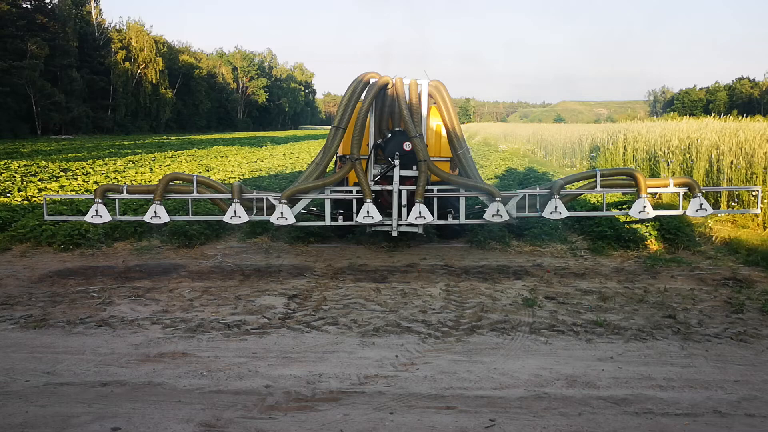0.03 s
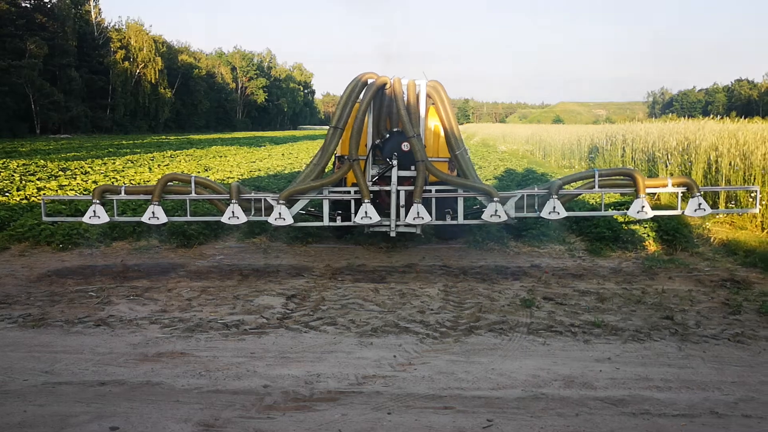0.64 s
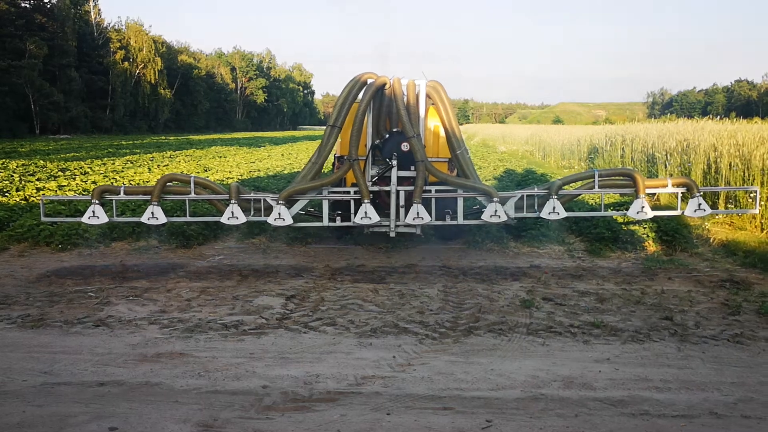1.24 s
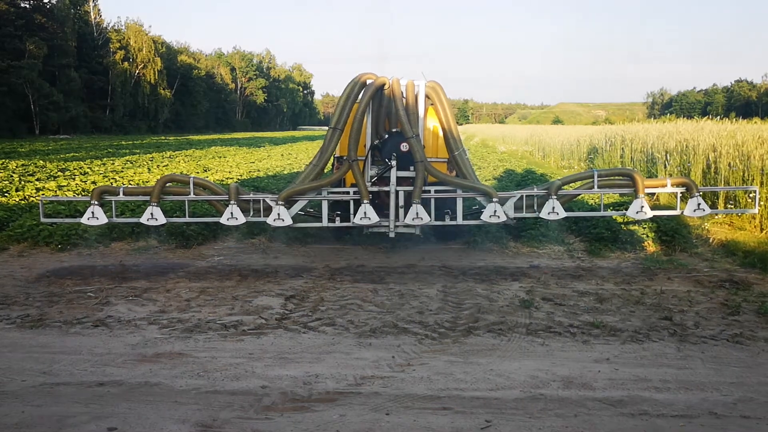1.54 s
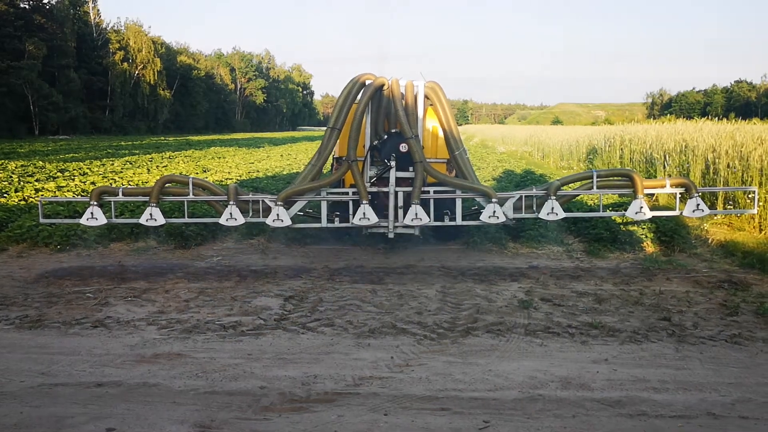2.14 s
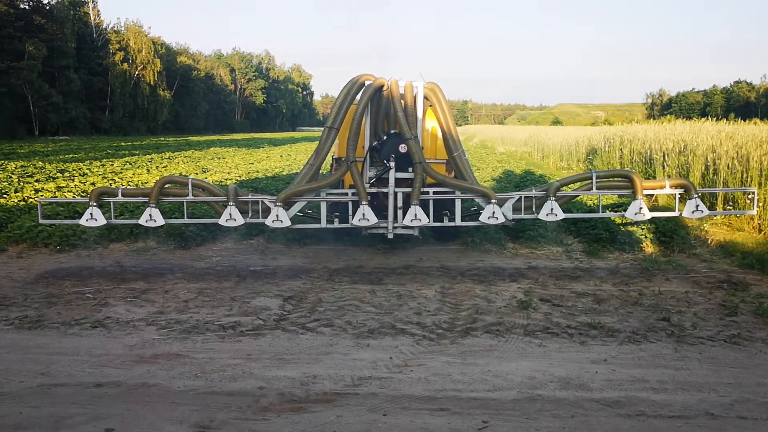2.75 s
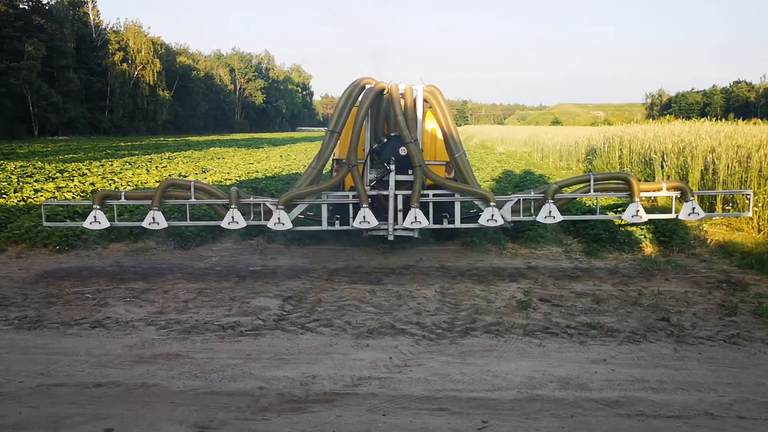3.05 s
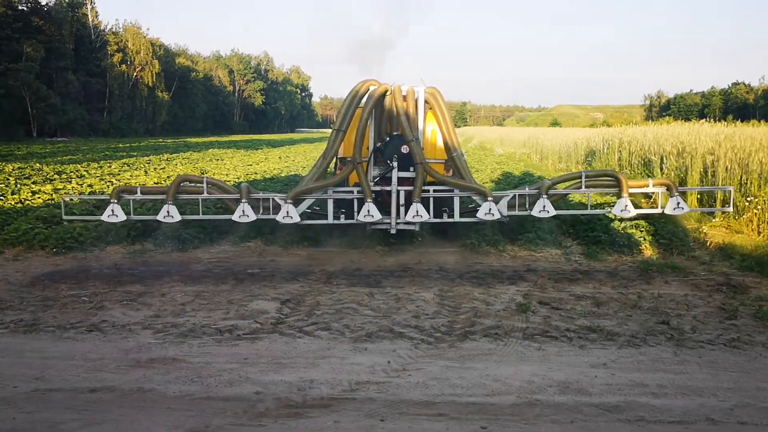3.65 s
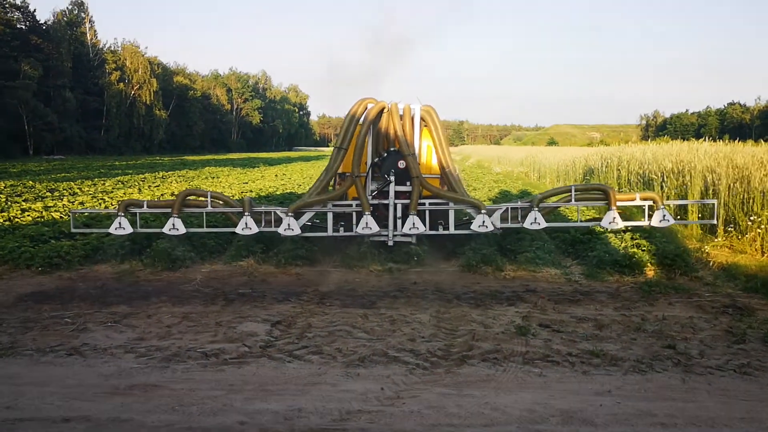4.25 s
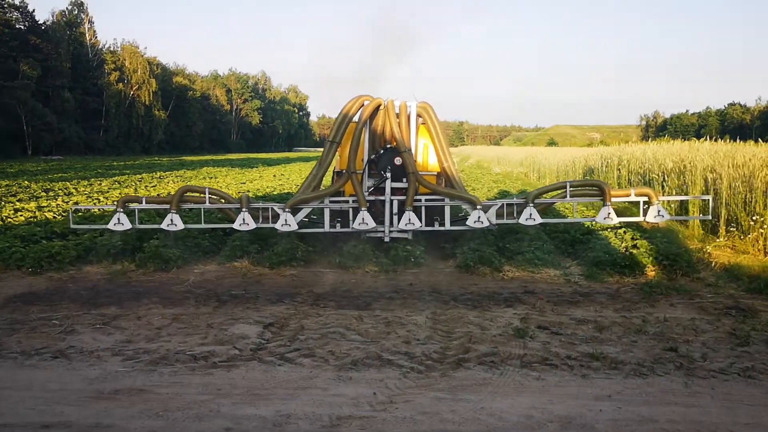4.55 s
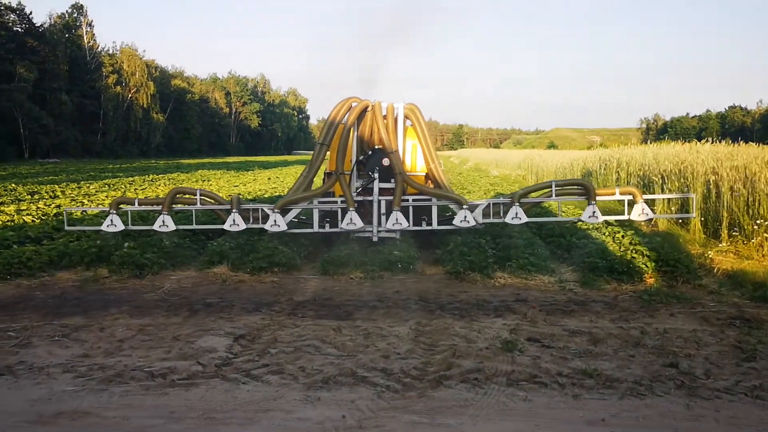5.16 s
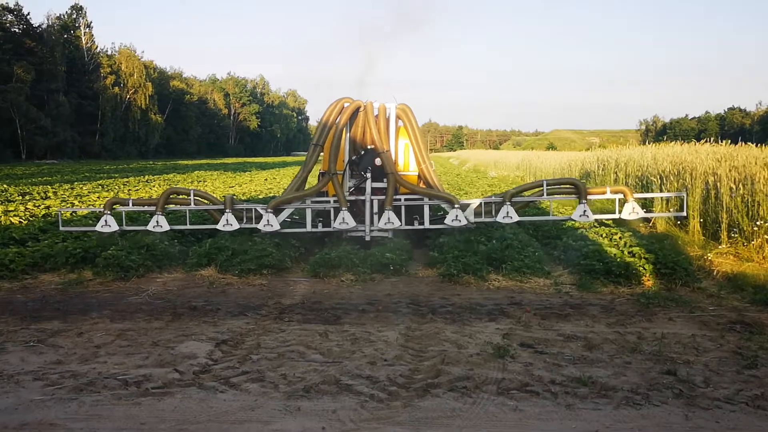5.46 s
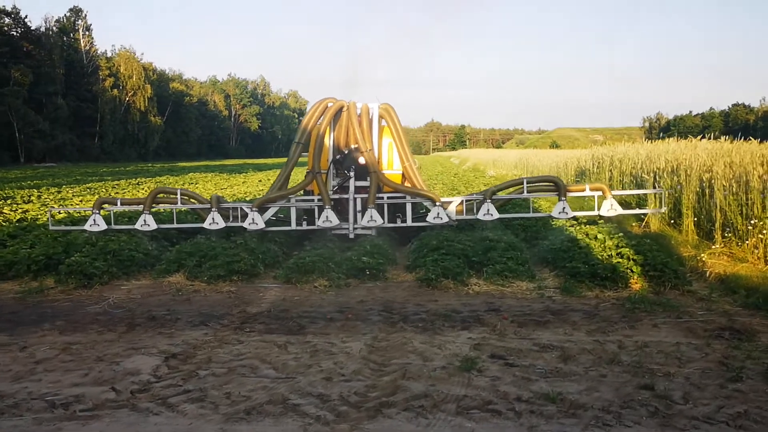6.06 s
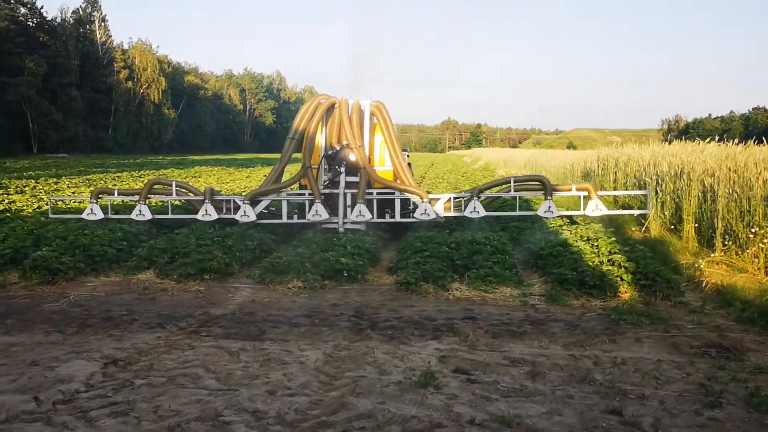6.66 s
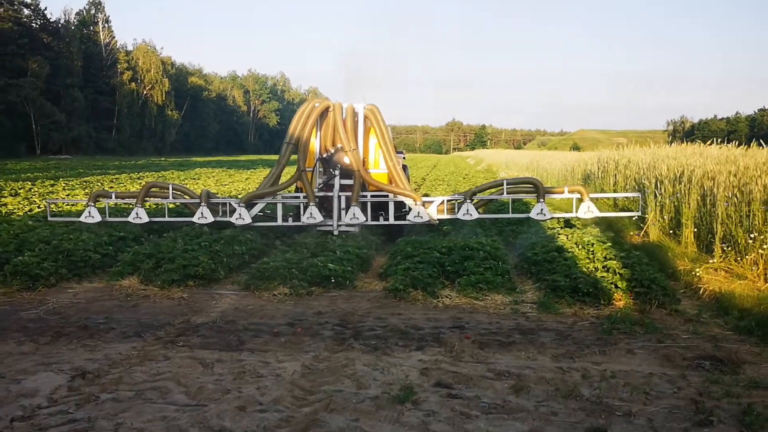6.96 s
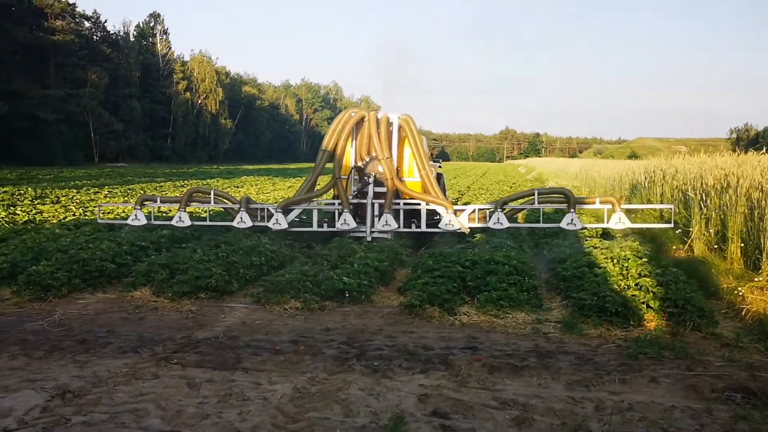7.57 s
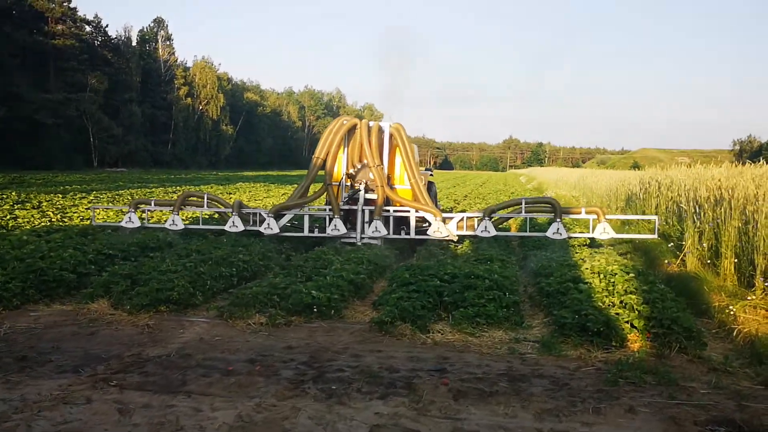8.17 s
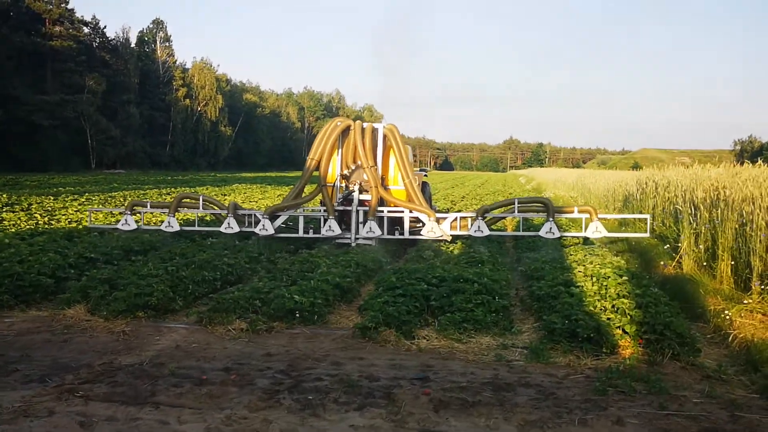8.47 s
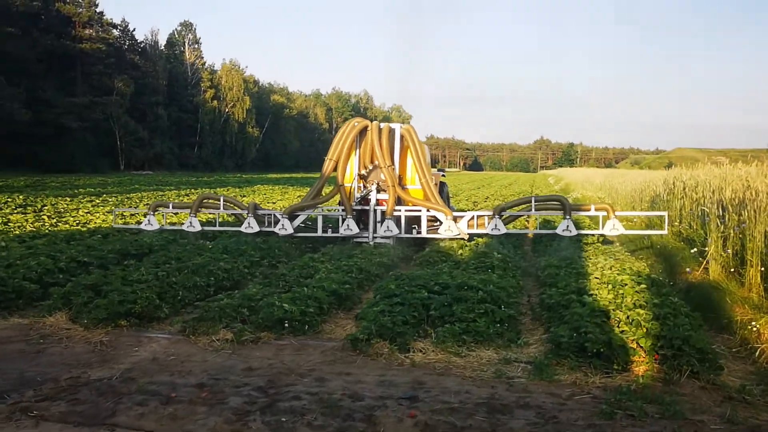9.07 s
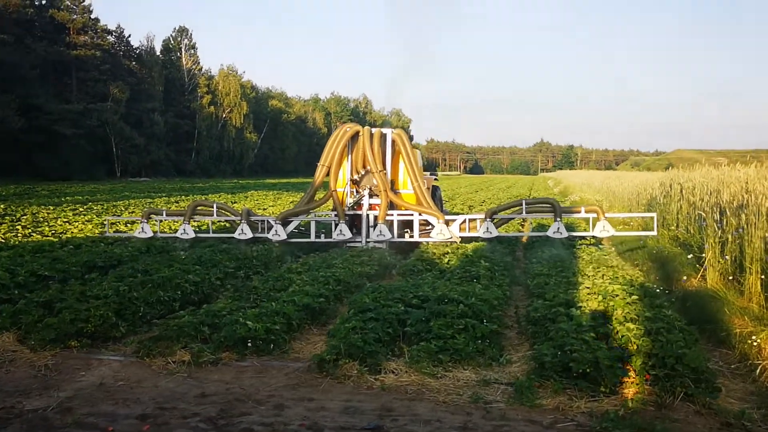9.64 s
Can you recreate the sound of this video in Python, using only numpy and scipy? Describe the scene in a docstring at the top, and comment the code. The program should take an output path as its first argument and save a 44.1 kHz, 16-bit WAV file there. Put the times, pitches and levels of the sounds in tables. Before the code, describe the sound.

A diesel tractor stands close by in a field, droning and clattering under the loud roar of its sprayer fan and a thin nozzle hiss. The engine sags under load, then speeds up and pulls away into the crop. The roar turns duller and somewhat quieter with distance, while a breeze rises and a few gusts bump the microphone.

```python
"""A three-cylinder diesel tractor stands with an air-blast sprayer; the sound cuts in, drops out, returns.
Periodic firing drives the exhaust drone, the clatter and the fan's tones; turbulence roars, nozzles hiss.
Near 3 s the engine sags under load, then speeds up and pulls away into a crop field. Interference with
a reflection off the soil combs the roar; the comb sinks with distance while leaves absorb the treble.
From about 4 s a breeze rises, and later its gusts bump the microphone."""
import sys
import numpy as np
from scipy import signal
from scipy.fft import rfft, irfft, next_fast_len
from scipy.io import wavfile
from scipy.ndimage import uniform_filter1d, map_coordinates

SR = 44100
rng = np.random.default_rng(int(sys.argv[2]) if len(sys.argv) > 2 else 0)


def transcribe(signal):
    """Save signal, clipped to [-1, 1], as a 16-bit WAV file at the path in sys.argv[1]."""
    frames = np.atleast_2d(signal).T
    limited = np.clip(frames, -1, 1)
    pcm = np.round(limited * 32767).astype(np.int16)
    wavfile.write(sys.argv[1], SR, pcm)


N = 437031

# gusts on the microphone: t/s, level/dB, width/s
GUST_EVENTS = [(5.67,-27,.03),(5.98,-23,.05),(6.3,-30,.08),(6.56,-24.5,.05),(7.88,-22.5,.05),(8.72,-21.5,.04),(8.815,-17.5,.03),(9,-27,.04)]
# brief swells of narrow-band noise: t/s, f/Hz, bandwidth/Hz, level/dB, width/s
SWELL_EVENTS = [(0.324,12400,4940,-52.5,0.068),(1.463,13800,3013,-60,0.085),(2.25,12100,3400,-66,0.059),(3.3,7600,300,-49,.14),(3.85,2130,600,-39.5,0.24),(4.618,3760,350,-41.5,0.1),(5.35,7600,690,-50,.2)]
# noise spectra of breeze, hard gust, spray, ducts and blower: f/Hz, relative density level/dB
BREEZE_SPECTRUM = [(8,0),(25,8.5),(90,1.5),(200,-1.5),(300,-12.5),(380,-20),(520,-30),(2000,-102.5)]
BUMP_SPECTRUM = [(8,-8),(30,2),(60,1),(120,-1),(240,-1),(330,-8),(480,-18),(560,-28),(700,-40),(2000,-80)]
SPRAY_SPECTRUM = [(1000,-23),(3000,2.5),(4800,-1),(6300,-3.5),(7500,2.5),(8600,-1.5),(9400,-3),(10500,-16),(12500,-26),(15000,-24.5)]
DUCT_SPECTRUM = [(10,-39),(30,-2),(55,5.5),(100,2.5),(160,0),(220,-3),(290,-7),(340,-10.5),(420,-45.5),(700,-26),(2000,-100)]
ROAR_SPECTRUM = [(100,-9),(300,1),(450,-4),(600,-7),(800,-5),(1050,0.5),(1350,-3),(1700,0),(2400,-4),(3200,-7.5),(4200,-14.5),(5100,-15.5),(6300,-16.5),(10000,-35.5),(15000,-44)]
# left-right coherence of wind, spray and machine noise: f/Hz, coherence (0-1)
WIND_COHERENCE = [(30,1),(100,0.65),(200,0.62),(400,0.081)]
SPRAY_COHERENCE = [(2000,0.36),(8000,0.043),(11000,.1)]
MACHINE_COHERENCE = [(300,1),(1200,1),(2400,0.43),(4500,0.4),(9000,0)]
# gear and pump lines before the casing: multiple of the firing rate, level/dB near, midway, far
GEAR_LINES = [(11.15,-56,-68,-74),(11.33,-53,-66,-72),(13,-53,-74,-78),(19.4,-78,-50,-50),(22.1,-62,-49,-56),(24.4,-51,-49.5,-66),(24.9,-48,-64,-72),(27.8,-51,-64,-70),(32.9,-62,-52,-51),(48,-62,-56,-58),(55.9,-51,-64,-70)]
# the fan's blade tone: t/s, level/dB
BLADE_LEVEL = [(.45,-37),(.62,-45),(.8,-35),(2.62,-34.5),(2.75,-46),(3.25,-42),(3.6,-35),(4.05,-36),(4.3,-29.3),(4.55,-33),(4.92,-32.5),(5.08,-46),(9.9,-52)]
# reflection off the soil: f/Hz, amplitude ratio to the direct sound
SOIL_REFLECTION = [(300,0.54),(600,0.74),(1300,0.63),(2400,0.64),(3200,0.82),(4500,0.25),(9000,.2)]
# cavity modes of the blower housing: f/Hz, bandwidth/Hz, relative level/dB
HOUSING_MODES = [(510,99,-11.5),(1181,140,1.5),(2398,117,0.5),(5245,970,-5)]
# exhaust harmonics 1-3 before the tailpipe: level/dB standing, level/dB at full throttle, gain/dB lugging
EXHAUST_HARMONICS = [(-28.4,-27.4,-1),(-30.3,-32,7.2),(-33.8,-30.5,-3)]
# firing rate of the engine: t/s, f/Hz
FIRING_RATE = [(0.27, 42.4), (1.45, 42.4), (1.5, 42.8), (2.6, 42.9), (2.87, 41.8), (2.98, 40.3),
               (3.17, 39.5), (3.49, 42.5), (3.89, 43.7), (4.05, 43.5), (4.53, 45.2), (5.5, 47.0),
               (5.74, 46.8), (6.87, 48.2), (9.9, 48.3)]
# path of the tractor: t/s, distance (0 near, 1 far)
DISTANCE = [(3,0.0096),(3.5,0.045),(4.5,0.25),(5,.32),(5.5,0.46),(8.3,0.7),(9,0.83),(9.9,0.83)]
# mismatch of the microphones: f/Hz, left minus right level/dB
MIC_BALANCE = [(100,0),(380,0),(1300,3.7),(2400,0),(4400,-2.2),(6000,-1),(8200,3.5),(11000,-18.5),(15000,-8.5)]
# spans in which sound passes: on t/s, off t/s
AUDIBLE_SPANS = [(.075,.094),(.2562,10)]


def amp(db):
    """Amplitude ratio of a level in decibels."""
    return 10 ** (np.asarray(db) / 20)


def unit(x):
    """Normalisation to rms 1."""
    return x / np.sqrt(np.mean(x ** 2) + 1e-20)


def along(points, hz):
    """Interpolation of (f/Hz, value) points on a logarithmic frequency axis."""
    f, v = np.transpose(points)
    return np.interp(np.log(hz + 1), np.log(f + 1), v)


def curves(rows):
    """Linear interpolation in time: one value per sample for each column after t/s."""
    times, *columns = np.transpose(rows)
    return [np.interp(np.arange(N) / SR, times, column) for column in columns]


def wobble(rate):
    """Smooth random modulation: a spline through rate knots a second."""
    return map_coordinates(rng.standard_normal(int(N * rate / SR) + 4), [np.arange(N) * rate / SR])


def filtered(x, response):
    """Linear filtering: the spectrum of x times a complex frequency response."""
    size = next_fast_len(N + 8192)
    return irfft(rfft(x, size) * response(np.fft.rfftfreq(size, 1 / SR)), size)[..., :N]


def highs(x, edge_hz):
    """Zero-phase high-pass filtering with a soft edge."""
    return filtered(x, lambda hz: 1 - 1 / (1 + (hz / edge_hz) ** 4))


def turbulence(spectrum, coherence, drive=1):
    """Partly coherent stereo noise of rms 1, amplitude-modulated by drive, then coloured."""
    angle = lambda hz: np.arccos(np.clip(along(coherence, hz), -1, 1)) / 2
    colour = lambda hz: amp(along(spectrum, hz)) * [np.cos(angle(hz)), np.sin(angle(hz))]
    mid, side = filtered(drive * rng.standard_normal((2, N)), colour)
    return unit(np.array([mid + side, mid - side]))


def tone(firings, order, waver_db, drift_rad):
    """An engine order: a sinusoid locked to the firing count, randomly modulated in level and phase."""
    phase = 2 * np.pi * (order * firings + rng.random()) + drift_rad * wobble(9)
    return unit(np.sin(phase) * amp(waver_db * wobble(12)))


def patchy(x, depth_db):
    """Spectral modulation: slow random patches of gain over frequency and time."""
    spectra = signal.stft(x, nperseg=512)[2]
    field = uniform_filter1d(rng.standard_normal(spectra.shape[1:]), size=4, axis=0)
    field = uniform_filter1d(field, size=110, axis=1)
    return signal.istft(spectra * amp(depth_db * unit(field)), nperseg=512)[1][:, :N]


def wind():
    """Turbulent pressure on the microphone: a breeze rises; the harder a gust, the brighter its bump."""
    t = np.arange(N) / SR
    breeze_db = np.interp(t, [3.9, 5.7], [-46.5, -31.5]) + 1.7 * wobble(8)
    gusts = sum(amp(db) * np.exp(-.5 * ((t - at) / width) ** 2) for at, db, width in GUST_EVENTS)
    force = gusts / gusts.max()
    buffet = (amp(breeze_db) + gusts * (1 - force)) * turbulence(BREEZE_SPECTRUM, WIND_COHERENCE)
    return buffet + gusts * force * turbulence(BUMP_SPECTRUM, WIND_COHERENCE)


def noise_swells():
    """Narrow-band noise under Gaussian envelopes: faint high sizzles, whistles and a rushing surge."""
    t = np.arange(N) / SR
    out = np.zeros((2, N))
    for at, centre_hz, width_hz, db, width_s in SWELL_EVENTS:
        passband = lambda hz: np.exp(-2 * ((hz - centre_hz) / width_hz) ** 2)
        band = filtered(rng.standard_normal((2, N)), passband)
        out += amp(db) * np.exp(-.5 * ((t - at) / width_s) ** 2) * unit(band)
    return out


def nozzles(throttle):
    """Jet noise of air and spray: a hiss that grows with the throttle and drifts in colour."""
    hiss = turbulence(SPRAY_SPECTRUM, SPRAY_COHERENCE, drive=amp(0.81 * wobble(13)))
    return amp(-42 + 1.73 * throttle) * patchy(hiss, depth_db=1.3)


def duct_rumble(firings, away):
    """Low turbulence in ducts and exhaust, amplitude-modulated by the firing; duller when far."""
    throb = 1 + 0.29 * np.cos(2 * np.pi * firings)
    air = turbulence(DUCT_SPECTRUM, MACHINE_COHERENCE, drive=throb * amp(0.42 * wobble(16)))
    air = air - (1 - amp(-8.5 * away)) * highs(air, edge_hz=400)
    return amp(-30 - 3.5 * away ** 2) * air


def gear_whines(firings, firing_hz, away, casing_hz=516.3, width_hz=13.3, boost_db=6.5):
    """Gear and pump lines fade or emerge with distance; a casing resonance lifts any that crosses it."""
    level = lambda dbs: amp(np.interp(away, [0, .5, 1], dbs))
    casing = lambda hz: amp(boost_db * np.exp(-((hz - casing_hz) / width_hz) ** 2))
    return sum(level(dbs) * casing(order * firing_hz) * tone(firings, order, waver_db=3.5, drift_rad=0.78)
               for order, *dbs in GEAR_LINES)


def fan(firings, throttle):
    """The blade-passing tone and the hum of the fan's drive, both geared to the engine."""
    blade_db, = curves(BLADE_LEVEL)
    blades = amp(blade_db) * tone(firings, order=7.58, waver_db=1, drift_rad=.12)
    hum = amp(-59 + 18.5 * throttle) * tone(firings, order=6.47, waver_db=1.2, drift_rad=.18)
    return blades + hum


def ground_effect(direct, away, near_lag_s=0.000876, far_lag_s=0.001606, turn_rad=0.96, side_db=8):
    """Comb filtering: direct sound interferes with its delayed reflection, phase-shifted by soft soil."""
    lag = (near_lag_s + (far_lag_s - near_lag_s) * away) * SR
    bounce = filtered(direct, lambda hz: along(SOIL_REFLECTION, hz) * np.exp(1j * turn_rad))
    # far out, crop leaves scatter much of the reflection's upper range
    bounce = bounce - 0.61 * away ** 3 * highs(bounce, edge_hz=750)
    reflected = []
    for channel, side in zip(bounce, (1, -1)):  # later and weaker on the left, the reverse on the right
        delayed = map_coordinates(channel, [np.arange(N) - lag * (1 + side * 0.044)], order=3)
        reflected.append(amp(-side * side_db) * delayed)
    return direct + np.array(reflected)


def knocks(firings, ring_s, scatter_db, uneven_db, count):
    """Envelope of injector and valve impacts: exponential decays, their pattern three firings long."""
    cycles = firings / 3
    place = (np.arange(count) + rng.uniform(-.4, .4, count)) / count
    pattern_db = uneven_db * rng.permutation(np.linspace(-1, 1, count))
    knock_cycles = np.arange(int(cycles[-1]) + 1)[:, None] + place
    onsets = np.interp(knock_cycles.ravel(), cycles, np.arange(N)).astype(int)
    sizes = amp(pattern_db + scatter_db * rng.standard_normal(knock_cycles.shape))
    impulses = np.bincount(onsets, sizes.ravel(), N)
    return unit(signal.lfilter([1], [1, -np.exp(-1 / (ring_s * SR))], impulses))


def housing_response(hz):
    """Cavity resonance of the blower housing: each mode is a squared second-order band-pass."""
    return sum(amp(db) * (1j * hz * width / (mode_hz ** 2 - hz ** 2 + 1j * hz * width)) ** 2
               for mode_hz, width, db in HOUSING_MODES)


def machine_roar(firings, throttle, lug, away):
    """Blower turbulence, modulated by diesel clatter, excites the housing and reflects off the soil."""
    clatter = knocks(firings, ring_s=0.0046, scatter_db=1.5, uneven_db=2.0, count=15)
    drive = np.sqrt(amp(1.46 * wobble(14)) + amp(0.5) * clatter ** 2)  # powers add
    white = turbulence([(1000, 0)], MACHINE_COHERENCE, drive)
    housing = unit(filtered(white, housing_response))
    roar = turbulence(ROAR_SPECTRUM, MACHINE_COHERENCE, drive) + amp(-8 - 8.5 * away) * housing
    # leaves absorb the treble as the machine moves into the crop
    roar = roar - (1 - amp(-22.5 * away ** 2)) * highs(roar, edge_hz=3520)
    roar_db = -31 + throttle - 2 * lug - 4 * away
    return amp(roar_db) * unit(ground_effect(roar, away))


def exhaust(firings, firing_hz, throttle, lug, tailpipe_hz=46.6, width_hz=1.9, boost_db=3.7):
    """Firing harmonics boom under load or at tailpipe resonance; unequal cylinders add lines between."""
    drone = 0
    for order, (stand_db, full_db, lug_db) in enumerate(EXHAUST_HARMONICS, 1):
        level_db = stand_db + (full_db - stand_db) * throttle + lug_db * lug
        resonance_db = boost_db * np.exp(-((order * firing_hz - tailpipe_hz) / width_hz) ** 2)
        drone += amp(level_db + resonance_db) * tone(firings, order, waver_db=1, drift_rad=.08)
    lope = sum(tone(firings, order=k / 3, waver_db=3.5, drift_rad=.3) for k in (4, 5, 7, 8, 10, 11))
    return drone + amp(-45.5) * lope


def effort(firing_hz, lug_hz=40, stand_hz=43.15, pull_hz=43.6):
    """Engine load as throttle and lugging, each 0-1: firing above or below the standing rate."""
    throttle = (firing_hz - stand_hz) / (pull_hz - stand_hz)
    lug = (stand_hz - firing_hz) / (stand_hz - lug_hz)
    return np.clip(throttle, 0, 1), np.clip(lug, 0, 1)


def scene():
    """Superposition of wind, noise swells and the machine, whose parts share one crankshaft."""
    firing_hz, = curves(FIRING_RATE)
    away, = curves(DISTANCE)
    throttle, lug = effort(firing_hz)
    firings = np.cumsum(firing_hz) / SR
    drone = exhaust(firings, firing_hz, throttle, lug)
    tones = fan(firings, throttle) + gear_whines(firings, firing_hz, away)
    noises = duct_rumble(firings, away) + nozzles(throttle) + noise_swells()
    return drone + tones + noises + machine_roar(firings, throttle, lug, away) + wind()


def record(dry, lead_s=.00006, top_hz=15150):
    """Level and time differences at two microphones, the left leading; an early dropout; a band limit."""
    sides = np.array([[.5], [-.5]])
    response = lambda hz: amp(sides * along(MIC_BALANCE, hz)) * np.exp(2j * np.pi * hz * sides * lead_s)
    heard = filtered(dry, response)
    t = np.arange(N) / SR
    gate = sum((t >= on) & (t < off) for on, off in AUDIBLE_SPANS)
    return filtered(heard * gate, lambda hz: hz < top_hz)


dry = scene()
out = record(dry)
transcribe(out)
```